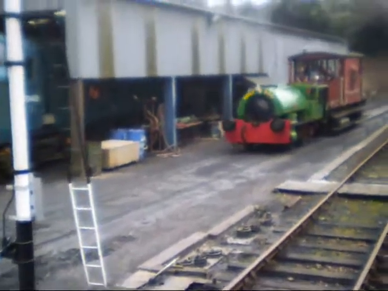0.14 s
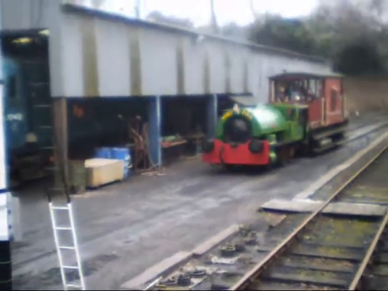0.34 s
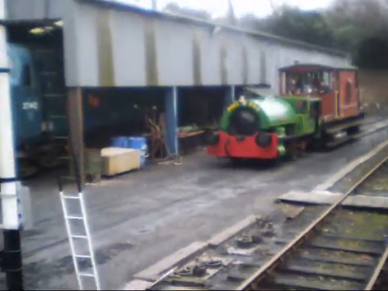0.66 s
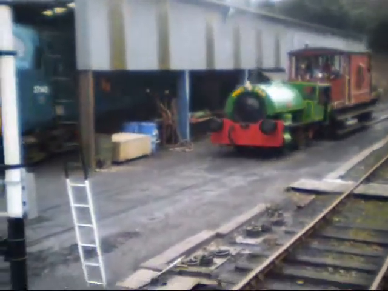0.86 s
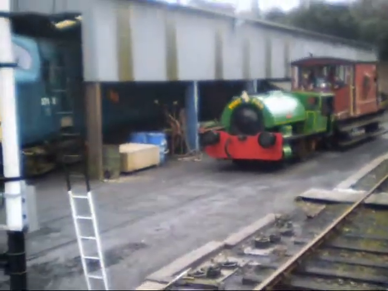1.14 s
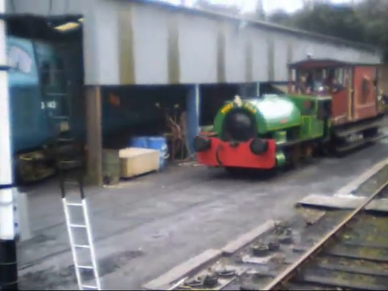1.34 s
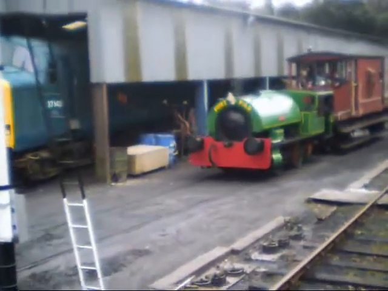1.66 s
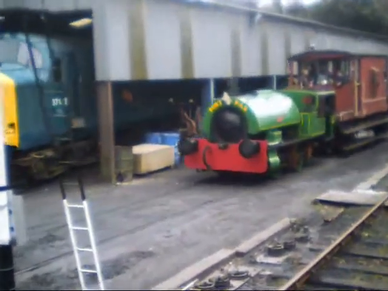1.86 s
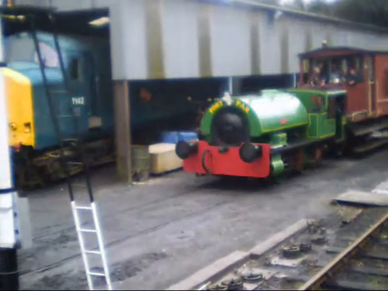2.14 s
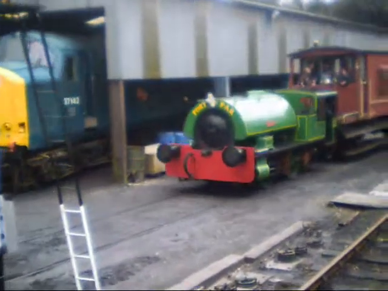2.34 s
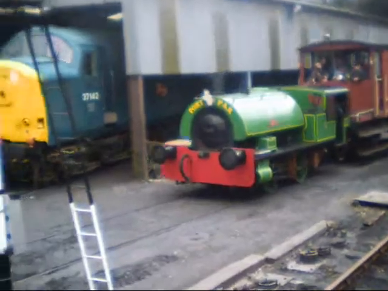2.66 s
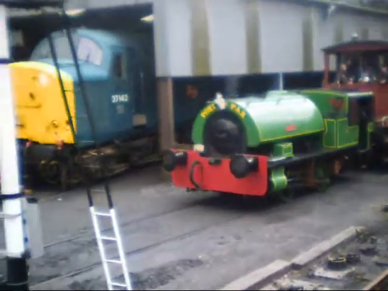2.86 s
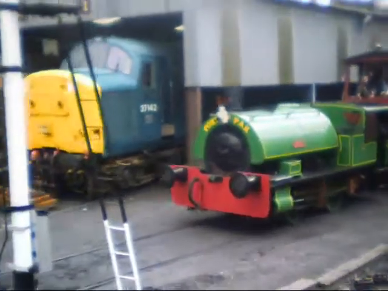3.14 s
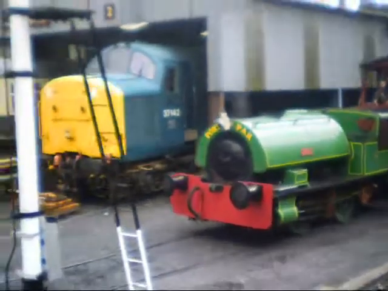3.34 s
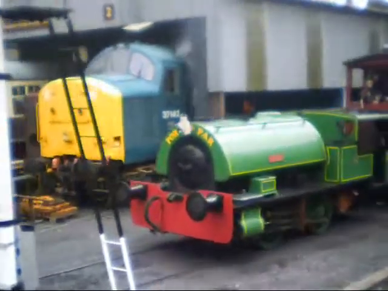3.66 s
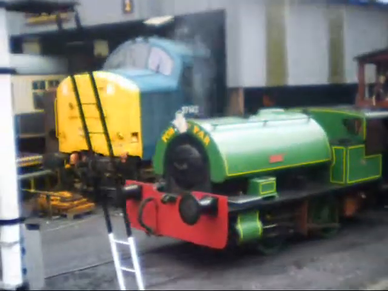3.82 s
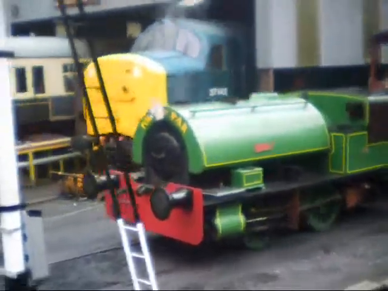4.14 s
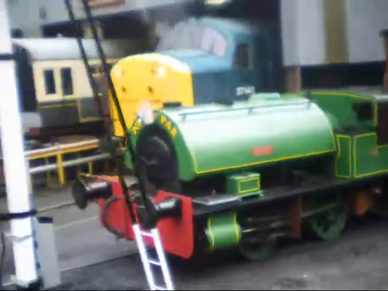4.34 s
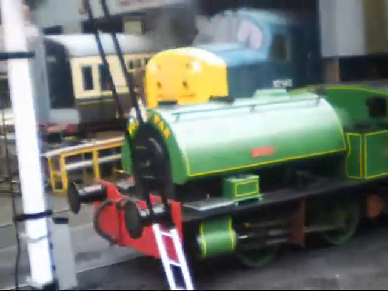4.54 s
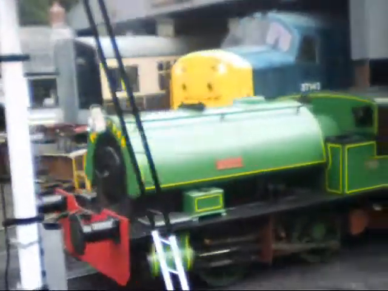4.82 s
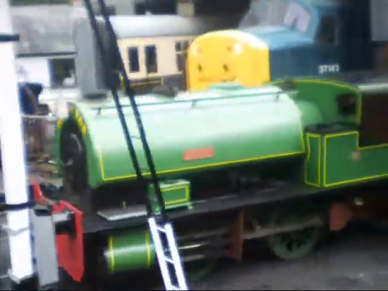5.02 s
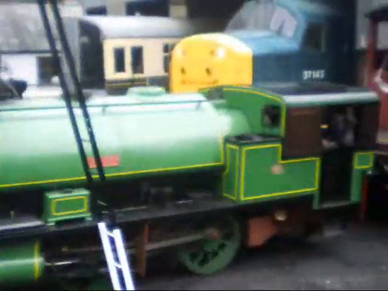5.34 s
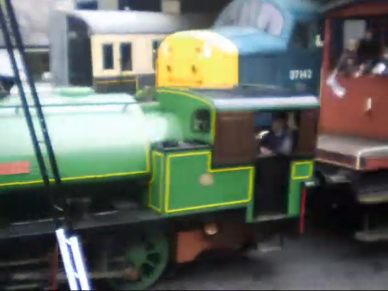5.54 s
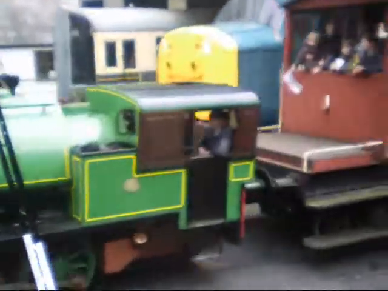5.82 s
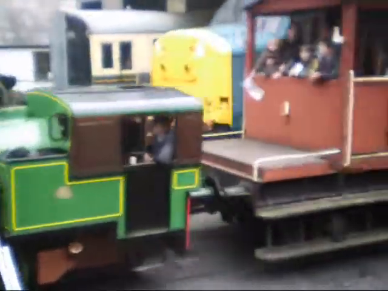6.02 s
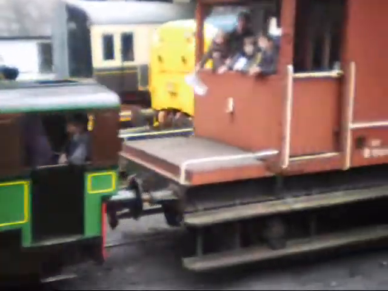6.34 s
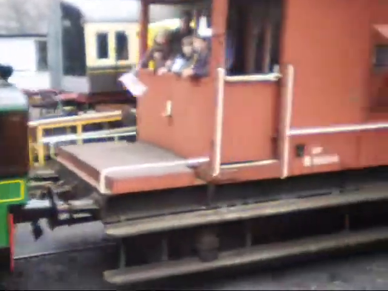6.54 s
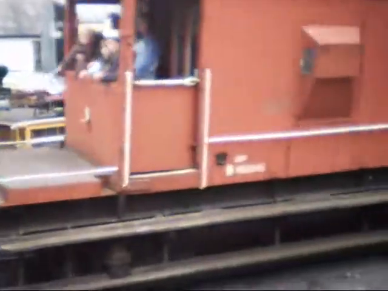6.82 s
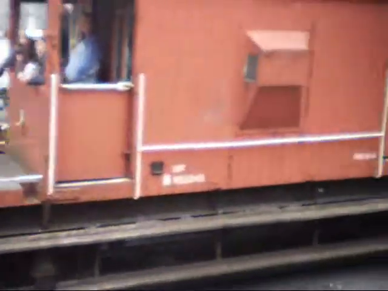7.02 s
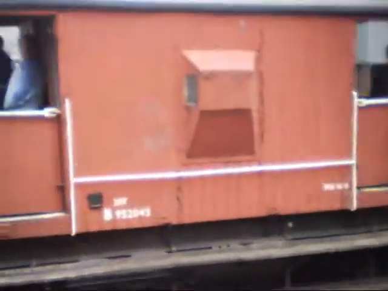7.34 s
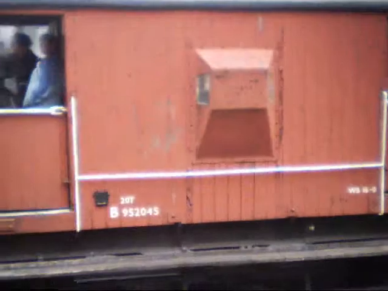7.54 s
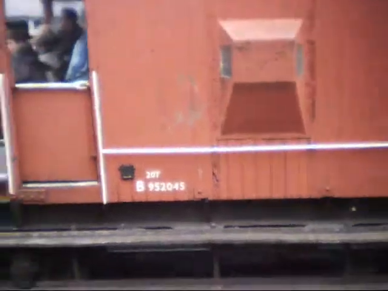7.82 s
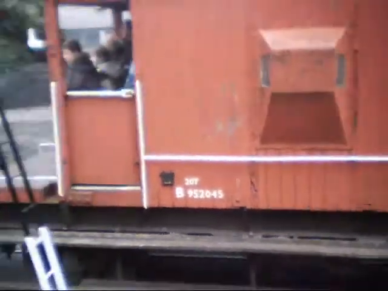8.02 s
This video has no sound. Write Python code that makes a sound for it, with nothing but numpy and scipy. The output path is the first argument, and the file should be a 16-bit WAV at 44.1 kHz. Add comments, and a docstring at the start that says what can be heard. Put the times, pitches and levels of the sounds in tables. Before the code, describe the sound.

Breathy, wavering steam hiss from a passing tank engine, gusty wind thumps, then ringing metallic knocks and a brief squeak as its wagon rolls by.

```python
"""Beside a shed on a windy day, a small steam tank engine and its brake van roll slowly past, close by.
The chimney draught is noise with pipe resonances, which gives way to the van's rolling noise.
Blast, leaking cylinders and fine hiss are flickering noise bands with breathy, wandering whistles.
Wheels knock over rail joints as ringing modes with grit, and flanges squeak as brief gliding sines.
Wind buffets a small microphone with gusty low noise; halved-rate samples held twice mirror the treble."""
import sys
import numpy as np
from scipy import signal
from scipy.fft import rfft, irfft, next_fast_len
from scipy.io import wavfile
from scipy.ndimage import uniform_filter1d

SR = 44100
rng = np.random.default_rng(int(sys.argv[2]) if len(sys.argv) > 2 else 0)


def store_pcm(level_fs):
    """Save levels as 16-bit WAV."""
    pcm = np.round(np.clip(level_fs, -1, 1) * 32767).astype(np.int16)
    wavfile.write(sys.argv[1], SR, np.atleast_2d(pcm).T)


N = 360583   # length in samples

# All spectrum tables below give relative levels: each noise is scaled to rms 1 before use.

# The train going by, ahead of puffs, rumble and dips. Each row: time in seconds,
# then draught and rolling, blast, leak and fine hiss, all in dB.
TRAIN_LEVELS = [(0.0, -43, -41.5, -45, -50.5), (0.3, -44, -43.5, -46, -50.5),
                (0.6, -42, -44.5, -47.5, -52.5), (1.3, -44.5, -44, -44.5, -50.5),
                (1.9, -42, -41, -46, -49.5), (2.5, -43, -39, -45.5, -47), (3.3, -42, -38, -44.5, -44),
                (3.8, -42, -37, -43, -43), (4.4, -42.5, -40.5, -45, -45), (4.9, -43, -41, -43, -46),
                (5.4, -45, -44, -44.5, -46), (5.9, -45, -44, -42.5, -46.5), (6.4, -43, -44, -44.5, -44.5),
                (6.7, -44, -42.5, -45.5, -42), (7.2, -42.5, -45, -46, -41.5), (7.7, -43, -46, -49.5, -46.5),
                (8.05, -42.5, -46.5, -49.5, -43.5), (8.18, -39.5, -42, -49, -46)]
# Slow changes as it passes. Each row: time in seconds, how far the van has replaced the engine (0-1),
# centre of the leak whistle in Hz, whistle level in dB against the leak noise.
PASSING = [(0, 0, 4930, -27), (1.5, 0, 4680, -1), (2.5, 0.08, 4830, 2), (3.6, 0.21, 4670, -1),
           (4.5, 0.19, 5320, -9), (5.0, 0.15, 5260, -1), (5.15, 0.2, 5400, -5), (5.4, 0.02, 5250, 5),
           (5.55, 0.04, 5130, -1), (5.8, 0, 5100, -2), (6.1, 0.04, 5020, 2), (6.4, 0.15, 5100, -6),
           (6.8, 0.34, 5550, -3), (7.3, 0.78, 5480, -1), (8.18, 0.8, 5480, -21)]
# Draught spectrum. Each row: frequency in Hz, level in dB per Hz.
DRAUGHT_SPECTRUM = [(350, -10), (600, -8), (800, -3), (1200, -2.5), (1700, -6), (1950, -6.5), (2400, -6)]
# Chimney pipe modes, ahead of Doppler. Each row: frequency in Hz, width in Hz, height in dB.
CHIMNEY_MODES = [(729, 39, 6), (862, 3.9, 12), (991, 42, 8), (1128.5, 31, 9), (1255, 15, 10.5),
                 (1387, 30, 10), (1675, 43, 8.5)]
# Rolling noise of the van. Each row: frequency in Hz, level in dB per Hz.
ROLLING_SPECTRUM = [(260, -70), (450, -23), (492, -19), (897, -11), (1090, -7), (1280, -14), (1320, -13),
                    (1570, 3.5), (2300, -8.5), (2990, -9), (5060, -120)]
# Blast before the chimney has gone by. Each row: frequency in Hz, level in dB per Hz.
BLAST_SPECTRUM = [(1700, -36), (2050, -8.5), (2500, 3), (3300, 2.5), (4200, 4.5), (4600, -2), (5200, -24)]
# Nozzle resonances in that blast. Each row: frequency in Hz, width in Hz, height in dB.
NOZZLE_MODES = [(2112, 66, 13), (2280, 32, 11.5), (3190, 100, 4.5)]
# Blast once the chimney has gone by. Each row: frequency in Hz, level in dB per Hz.
BLAST_BEHIND_SPECTRUM = [(1700, -24), (2050, -3.5), (2600, 0), (3050, 1), (3350, -3.5), (3800, 2),
                         (4250, -1.5), (4600, 1), (5200, -22)]
# Three breathy tones in the blast, which glide, come and go. Each row: time in seconds, then centre in Hz
# and level in dB against the broad blast noise, for the low, middle and high tone in turn.
BLAST_TONES = [(0, 2800, -3, 3600, -4, 4150, -24), (0.4, 2814, -9.5, 3624, -7.5, 4150, -26),
               (1.2, 2786, -6, 3600, -12, 4180, -16), (1.9, 2765, -13, 3640, -7.5, 4195, -7),
               (2.3, 2777, -7, 3710, -5.5, 4110, -13), (2.75, 2760, -7, 3675, -2, 4100, -14),
               (3.0, 2794, -11, 3640, -9, 4100, -10), (3.3, 2820, -2.5, 3700, -3.5, 4120, -14),
               (3.6, 2730, -6, 3694, -11, 4074, -0.5), (3.9, 2722, -2.5, 3620, -6, 4150, -18),
               (4.4, 2710, -5, 3630, -13, 4490, -17), (4.8, 2690, -11, 3680, -12, 4600, -5),
               (5.5, 2642, -6, 3760, -11, 4670, -9), (6.2, 2667, -4.5, 3810, -8.5, 4610, -11),
               (6.8, 2725, -6, 3806, -7.5, 4650, -10), (7.3, 2740, -13, 3720, -16, 4600, -20),
               (7.46, 2744, -22, 3630, -3.5, 4530, -18), (7.9, 2840, -8, 3684, -3, 4600, -20),
               (8.18, 2870, -3, 3530, -2, 4590, -20)]
# Steam leaking at the cylinders. Each row: frequency in Hz, level in dB per Hz.
LEAK_SPECTRUM = [(3800, -66), (4300, 0.5), (4700, 7), (5500, 6), (6300, 1), (6700, -7), (7200, -38)]
# Fine hiss of the engine. Each row: frequency in Hz, level in dB per Hz.
HISS_SPECTRUM = [(3820, -16), (6500, 3), (6760, -2.5), (7220, 4), (7730, 1.5), (8870, 5.5), (11000, 2),
                 (14300, -49), (22000, -120)]
# Fine hiss once the engine has gone by. Each row: frequency in Hz, level in dB per Hz.
HISS_BEHIND_SPECTRUM = [(3820, -33), (6500, -32), (6790, 10), (7180, -16), (7730, 8.5), (8050, 8),
                        (11000, 6.5), (14300, -34), (22000, -120)]
# Puffs of steam. Each row: moment of the top in seconds, rise of the blast in dB, rise of the leak in dB.
PUFFS = [(1.87, -1.5, 0.5), (2.62, 2, 5.5), (2.8, 0.5, 1), (3.91, 1.5, 3), (4.2, 3.5, -0.5), (4.47, 4.5, 5),
         (4.9, 4, 2), (5.33, 1, 11.5), (5.67, 0.5, 2.5), (6.2, 2, 3.5), (6.51, 6, 1.5), (7.45, 3.5, 3),
         (7.72, 1.5, 1), (7.88, 2.5, 3.5)]
# The steam and rolling levels dip briefly. Each row: moment in seconds, depth in dB.
DIPS = [(1.36, 0.5), (3.16, 1.5), (4.28, 2.5), (4.8, 2.5), (4.97, 3.5), (7.27, 2.5)]
# Wheels over rail joints, with bounces. Each row: start in seconds, peak of the blow in dB before echoes,
# level of the grit in dB, length of contact in seconds.
KNOCKS = [(5.017, -28, 20, 0.007), (5.571, -24.5, 14, 0.008), (5.588, -33, 6, .012), (5.612, -33, 2, .03),
          (6.45, -17, 2, 0.013), (6.467, -19, -1, 0.018), (6.485, -29, 24, 0.012), (7.196, -27, 16, 0.03)]
# Modes of a wheel. Each row: frequency in Hz, level in dB, time to fall by 60 dB in seconds.
WHEEL_MODES = [(640, -12, .1), (880, -8, .1), (990, -11, .1), (1090, -10, .09), (1175, -4, .09),
               (1225, 0, .09), (1400, -13, .08), (1540, -6, .04), (1730, -9, .06), (1980, -7, .035),
               (2260, -8, .03), (2670, -14, .05)]
# Echoes off shed and wagons. Each row: delay in seconds, level in dB.
YARD_ECHOES = [(.021, -11), (.047, -15), (.083, -19)]
# Flange squeaks. Each row: middle in seconds, pitch there in Hz, peak in dB before flicker,
# rise in seconds, fall in seconds.
SQUEAKS = [(6.51, 4340, -22.5, 0.012, 0.025), (7.351, 8250, -25, 0.04, 0.014),
           (7.455, 3600, -40, 0.016, 0.05)]
# Slow wind pressure. Each row: frequency in Hz, level in dB per Hz.
BUFFET_SPECTRUM = [(1.2, -32), (2.0, 11.5), (18, 4), (26, -2), (124, -23), (160, -31), (210, -68),
                   (350, -120)]
# Faster wind flutter. Each row: frequency in Hz, level in dB per Hz.
FLUTTER_SPECTRUM = [(60, 7.5), (110, 1.5), (200, -0.5), (320, -6.5), (500, -27.5), (800, -24)]
# Top of the flutter in hard gusts. Each row: frequency in Hz, level in dB per Hz.
RASP_SPECTRUM = [(200, -1.5), (300, 6), (450, 1), (650, -10.5), (900, -5.5)]
# Steady wind at the microphone. Each row: time in seconds, buffet level in dB, flutter level in dB.
BREEZE = [(0.0, -34, -56), (0.5, -26, -59), (0.62, -28.5, -51), (0.8, -43.5, -60.5), (1.6, -38.5, -58),
          (2.4, -40.5, -61), (2.7, -33.5, -54.5), (3.9, -42, -58), (4.5, -36, -48), (4.7, -35, -52.5),
          (5.2, -42.5, -61), (5.5, -34, -54.5), (6.1, -32.5, -43.5), (6.999, -36, -52), (7.5, -34.5, -40.5),
          (8.18, -40, -53.5)]
# Gusts on top of it. Each row: middle in seconds, length in seconds, buffet level in dB, flutter level in dB.
GUSTS = [(0.3, .07, -26, -36.5), (0.471, 0.088, -21, -41.5), (1.13, 0.036, -38, -70),
         (1.343, 0.13, -29, -51.5), (1.912, 0.12, -25.5, -46.5), (2.036, 0.22, -27.5, -52),
         (2.19, 0.092, -22, -49.5), (2.318, 0.099, -30.5, -53), (2.517, 0.13, -32, -57),
         (2.703, 0.35, -42, -69), (2.874, 0.038, -29, -47), (3.107, 0.11, -33.5, -53),
         (3.311, 0.047, -50, -46.5), (3.776, 0.22, -33, -55), (4.049, 0.042, -27.5, -44),
         (4.179, 0.16, -25.5, -37), (4.34, 0.1, -22.5, -34.5), (4.457, 0.16, -22.5, -33.5),
         (4.935, 0.19, -35, -42.5), (5.318, 0.073, -30, -41), (5.508, 0.099, -37, -39),
         (5.761, 0.037, -28, -39), (5.961, 0.12, -33, -32.5), (6.25, 0.17, -37, -34.5),
         (6.388, 0.3, -52, -33.5), (6.627, 0.1, -48, -35), (6.733, .09, -25, -48),
         (6.824, 0.11, -30, -34.5), (7.05, 0.12, -28.5, -44), (6.926, 0.046, -45, -36.5),
         (7.095, .03, -44, -35), (7.133, .03, -45, -34), (7.194, 0.034, -45, -35), (7.273, 0.068, -30, -39),
         (7.375, 0.21, -43, -34.5), (7.462, 0.035, -46, -33.5), (7.547, 0.17, -35, -35),
         (7.654, .04, -35, -40), (7.715, 0.048, -47, -35.5), (8.08, 0.21, -31.5, -44)]
# The train and wind fall at once and creep back. Each row: moment in seconds, depth in dB.
DROPS = [(0.64, 4), (4.525, 4.5)]

SPEED_M_PER_S, ABREAST_S, TURN_S = 3.0, 4.8, 1.6   # the engine approaches, draws level, recedes
NEAR_S, NEAR_LASTS_S, NEAR_DB, NEAR_FROM_HZ = 3.98, 0.56, -2.5, 1640   # added upper draught, chimney near
THIN_S, THIN_LASTS_S, THIN_DB = 5.13, 0.53, -5.5   # thin whistle as the cab passes; dB against hiss
BEHIND_S, BEHIND_TAKES_S = 4.4, 0.17   # the chimney goes by
TONE_WIDTHS_HZ, TONE_WAVER_HZ = (190, 170, 200), 18
CORE_DB, CORE_WIDTH_HZ, CORE_WANDER_HZ = -7, 35, 60   # a fine line inside each tone; dB against it
PUFF_RISE_S, PUFF_FALL_S = 0.053, 0.055
PUFF_IN_HISS, PUFF_IN_DRAUGHT = 0.69, 0.36   # shares of the blast's rise in dB
RUMBLE_DB, RUMBLE_S = 3.0, .09   # draught and rolling swell at each knock, then fade
DIP_S = 0.063
SQUEAK_GLIDE = .09   # pitch rises by this share per second
GUST_EDGE = 2.8   # steepness of a gust's flanks (2 = bell, more = flat top)
RASP_DB, RASP_FROM_DB, RASP_GROWTH = -49, -35.5, 3.35   # level at RASP_FROM_DB of flutter; power of growth
DROP_S, RETURN_S = 0.015, 1.22
OFFSET = -.0103   # constant shift, full scale 1, ahead of the top cut
CUTOFF_HZ = 15400


def train():
    """Draught gives way to rolling noise; blast, leak and hiss lie above, all flickering as turbulence."""
    low_db, blast_db, leak_db, hiss_db = levels()
    gone, whistle_hz, whistle_db = in_time(PASSING)
    engine, van = np.sqrt(1 - np.clip(gone, 0, 1)), np.sqrt(np.clip(gone, 0, 1))
    low = engine * draught() + van * noise(ROLLING_SPECTRUM)
    steam = amp(low_db) * low + amp(blast_db) * blast()
    steam = steam + amp(leak_db) * leak(whistle_hz, whistle_db)
    steam = steam + amp(hiss_db) * hiss(engine, van)
    return turbulent(steam, shared_db=2.3, own_db=1.5, slow_db=1.1)


def draught():
    """Air roars through the chimney pipe: resonant noise, Doppler-shifted, fuller on top when near."""
    t = np.arange(N) / SR
    speed = SPEED_M_PER_S * np.tanh((ABREAST_S - t) / TURN_S)
    roar = doppler(noise(DRAUGHT_SPECTRUM, CHIMNEY_MODES), speed)
    highpass = signal.butter(3, NEAR_FROM_HZ, "high", fs=SR, output="sos")
    upper = signal.sosfiltfilt(highpass, roar)
    return roar + amp(NEAR_DB) * np.exp(-((t - NEAR_S) / NEAR_LASTS_S) ** 2) * upper


def blast():
    """Steam from the nozzle: broad noise, more hollow from behind, and the gliding tones."""
    behind = .5 + .5 * np.tanh((np.arange(N) / SR - BEHIND_S) / BEHIND_TAKES_S)
    out = np.sqrt(1 - behind) * noise(BLAST_SPECTRUM, NOZZLE_MODES)
    out = out + np.sqrt(behind) * noise(BLAST_BEHIND_SPECTRUM)
    columns = in_time(BLAST_TONES)
    for hz, level_db, width_hz in zip(columns[::2], columns[1::2], TONE_WIDTHS_HZ):
        core_gain = amp(CORE_DB + 3.8 * drift(5.3))
        core = core_gain * whistle(hz + CORE_WANDER_HZ * drift(1.2), CORE_WIDTH_HZ)
        tone_gain = amp(level_db + 1.14 * drift(3.9))
        out = out + tone_gain * (whistle(hz + TONE_WAVER_HZ * drift(3.0), width_hz) + core)
    return rms_one(out)


def leak(whistle_hz, whistle_db):
    """Steam leaks at the cylinders: band noise and a wavering whistle, kept near constant power."""
    whistle_gain = amp(whistle_db + 2.3 * drift(25.0))
    tone = whistle_gain * whistle(whistle_hz + 35.0 * drift(9.0), 380.0)
    return (noise(LEAK_SPECTRUM) + tone) / np.sqrt(1 + amp(2 * whistle_db))


def hiss(engine, van):
    """Fine steam noise changes colour as the engine goes by; a thin high whistle swells with the cab."""
    thin = amp(THIN_DB) * np.exp(-((np.arange(N) / SR - THIN_S) / THIN_LASTS_S) ** 2)
    thin_whistle = thin * whistle(7280.0 + 60.0 * drift(3.8), 260.0) * amp(2.9 * drift(13.4))
    return engine * noise(HISS_SPECTRUM) + van * noise(HISS_BEHIND_SPECTRUM) + thin_whistle


def levels():
    """Levels in dB of draught and rolling, blast, leak and hiss: the slow pass, puffs, rumble and dips."""
    low_db, blast_db, leak_db, hiss_db = in_time(TRAIN_LEVELS)
    s, *rises_db = np.transpose(PUFFS)
    puff_db, spurt_db = (spread(bumps(s, PUFF_RISE_S, PUFF_FALL_S) @ db) for db in rises_db)
    rumble_db = RUMBLE_DB * spread(bumps(np.transpose(KNOCKS)[0], 0.0073, RUMBLE_S).max(axis=1))
    dip_s, dip_db = np.transpose(DIPS)
    lost_db = spread(bumps(dip_s, DIP_S, DIP_S) @ dip_db)
    raised_db = [low_db + PUFF_IN_DRAUGHT * puff_db + rumble_db, blast_db + puff_db,
                 leak_db + spurt_db, hiss_db + PUFF_IN_HISS * puff_db]
    return np.array(raised_db) - lost_db


def turbulent(x, shared_db, own_db, slow_db):
    """Steam eddies: narrow bands flicker partly together (most in the treble), partly alone, and wander."""
    size = next_fast_len(N)
    spectrum, hz = rfft(x, size), np.arange(size // 2 + 1) * SR / size
    edges = np.r_[0, np.arange(25, 105, 3.0) ** 2, SR]   # Hz, wider towards the treble
    together, out = drift(57.0), 0
    for low, high in zip(edges, edges[1:]):
        band = irfft(spectrum * ((hz >= low) & (hz < high)), size)[:N]
        flicker_db = shared_db * low / 16400.0 * together + own_db * drift(22.6) + slow_db * drift(0.92)
        out = out + band * amp(flicker_db)
    return out


def doppler(x, speed):
    """An approaching source (positive m/s) is heard slightly sped up, a receding one slowed."""
    return np.interp(np.cumsum(1 + speed / 343) % (N - 1), np.arange(N), x)


def knocks():
    """Each joint is a sharp blow that rings the wheel's modes, and a short gritty scrape."""
    out, t = np.zeros(N), np.arange(SR // 4) / SR
    grit_band = signal.butter(3, [700, 2500], "band", fs=SR, output="sos")
    for s, peak_db, grit_db, length in KNOCKS:
        contact = rng.standard_normal(len(t)) * np.exp(-t / max(length, .001))
        contact = contact * np.minimum(14.0 * t / length, 1)
        grit = signal.sosfilt(grit_band, contact)
        ring = 0
        for hz, level_db, t60 in WHEEL_MODES:
            ring = ring + np.sin(2 * np.pi * (hz * t + rng.random())) * amp(level_db - 60 * t / t60)
        blow = ring * (1 - np.exp(-t / 0.00026)) + amp(grit_db) * grit
        i = round(s * SR)
        out[i:i + len(t)] += amp(peak_db) * blow / np.abs(blow).max()
    return out


def squeaks():
    """A flange rubs briefly and one wheel mode swells and fades, its pitch gliding up."""
    t, out = np.arange(N) / SR, 0
    for s, hz, peak_db, rise, fall in SQUEAKS:
        late = t - s
        swell = np.exp(-(late / np.where(t < s, rise, fall)) ** 2) * np.exp(-np.abs(late) / 0.06)
        out = out + amp(peak_db) * swell * np.sin(2 * np.pi * hz * late * (1 + SQUEAK_GLIDE * late / 2))
    return out * amp(1.5 * drift(60.0))   # fast flicker


def yard(x):
    """Shed and wagons return a few delayed, weaker copies."""
    return x + sum(amp(db) * np.r_[np.zeros(round(s * SR)), x][:N] for s, db in YARD_ECHOES)


def wind():
    """Slow pressure lumps, and a faster flutter that bursts out where the pressure changes fast."""
    buffet_gain, flutter_gain = gusts()
    buffet = noise(BUFFET_SPECTRUM)
    heard = signal.sosfilt(signal.butter(2, [15, 90], "band", fs=SR, output="sos"), buffet)
    # even out the lumps, so that they keep pace with the gust
    strength = np.sqrt(uniform_filter1d(heard ** 2, SR // 8) + 0.35 * np.mean(heard ** 2))
    change = uniform_filter1d(np.abs(np.gradient(heard / strength)), SR // 100)
    bursts = (rms_one(change) + 0.5) * amp(1.7 * drift(17.7))
    flutter = rms_one(noise(FLUTTER_SPECTRUM) * bursts)
    rasp_gain = amp(RASP_DB) * (flutter_gain / amp(RASP_FROM_DB)) ** RASP_GROWTH
    rasp = rms_one(noise(RASP_SPECTRUM) * bursts)
    return buffet_gain * buffet / strength + flutter_gain * flutter + rasp_gain * rasp


def gusts():
    """Gain of buffet and flutter: the powers of breeze and gusts add."""
    s, length, *levels_db = np.transpose(GUSTS)
    late = np.arange(0, N / SR + .01, .005)[:, None] - s
    shape = np.exp(-2 * np.abs(2 * late / length) ** GUST_EDGE)
    gains = []
    for calm_db, gust_db in zip(in_time(BREEZE), levels_db):
        gains.append(np.sqrt(amp(2 * calm_db) + spread(shape @ amp(2 * gust_db))))
    return gains


def drops():
    """Gain that falls at once and creeps back."""
    s, db = np.transpose(DROPS)
    return amp(-spread(bumps(s, DROP_S, RETURN_S) @ db))


def whistle(hz, width_hz):
    """Narrow noise carried on a gliding centre frequency; rms 1."""
    turns = 2 * np.pi * np.cumsum(hz) / SR
    sos = signal.butter(2, width_hz / 2, fs=SR, output="sos")
    a, b = signal.sosfilt(sos, rng.standard_normal((2, N)))
    return rms_one(a * np.cos(turns) + b * np.sin(turns))


def noise(spectrum, peaks=()):
    """Noise of a given spectrum with resonances (Hz, width in Hz, dB) standing on it; rms 1."""
    size = next_fast_len(N)
    hz = np.maximum(np.arange(size // 2 + 1) * SR / size, .5)
    at, level_db = np.transpose(spectrum)
    gain = amp(np.interp(np.log(hz), np.log(at), level_db, left=-90, right=-90))
    for centre, width, peak_db in peaks:
        gain = gain * amp(peak_db / (1 + (2 * (hz - centre) / width) ** 2))
    return rms_one(irfft(rfft(rng.standard_normal(size)) * gain, size)[:N])


def drift(rate):
    """Slow chance, rms 1: noise at every 40th sample through a double one-pole low-pass at rate Hz."""
    r = np.exp(-80 * np.pi * rate / SR)
    chance = rng.standard_normal(N // 40 + 2002)
    slow = signal.lfilter([1], [1, -2 * r, r * r], chance)[2000:]   # skip the filter's start
    return np.interp(np.arange(N) / 40, np.arange(len(slow)), rms_one(slow))


def bumps(s, rise, fall):
    """One hump of height 1 for each moment s, on a 5 ms grid: bell-shaped rise, exponential fall."""
    late = np.arange(0, N / SR + .01, .005)[:, None] - np.asarray(s)
    return np.where(late < 0, np.exp(-(late / rise) ** 2), np.exp(-np.abs(late) / fall))


def spread(values):
    """From the 5 ms grid to every sample."""
    return np.interp(np.arange(N) / SR, .005 * np.arange(len(values)), values)


def in_time(rows):
    """Columns of a curve table at every sample."""
    s, *columns = np.transpose(rows)
    return [np.interp(np.arange(N) / SR, s, c) for c in columns]


def amp(db):
    """dB to gain."""
    return 10 ** (np.asarray(db) / 20)


def rms_one(x):
    """Scale to rms 1."""
    return x / np.sqrt(np.mean(x ** 2) + 1e-20)


def scene():
    """Train and wind share the drops; echoing knocks and dry squeaks join them on one channel."""
    return (drops() * (train() + wind()) + yard(knocks()) + squeaks())[None]


def record(dry):
    """Half-rate samples, each held twice: the treble mirrors about a quarter of SR; then the top is cut."""
    held = np.repeat(dry[:, ::2], 2, axis=1)[:, :N] + OFFSET
    return signal.sosfilt(signal.ellip(12, .2, 70, CUTOFF_HZ, fs=SR, output="sos"), held)


dry = scene()
out = record(dry)
store_pcm(out)
```